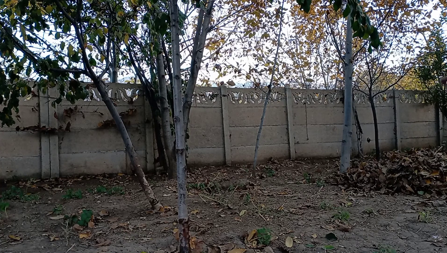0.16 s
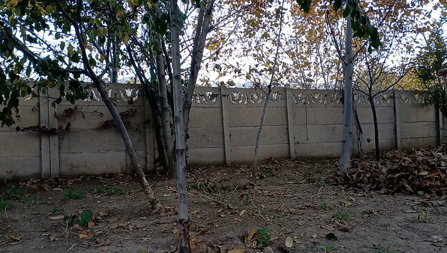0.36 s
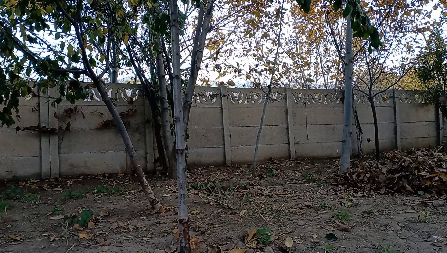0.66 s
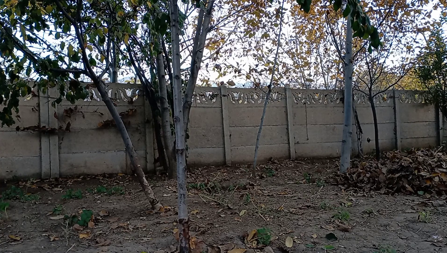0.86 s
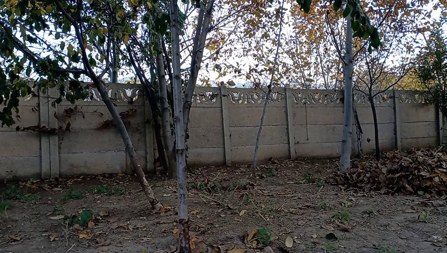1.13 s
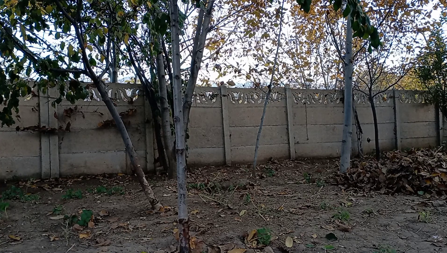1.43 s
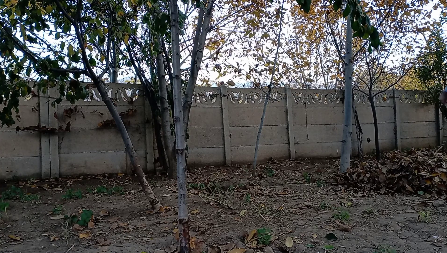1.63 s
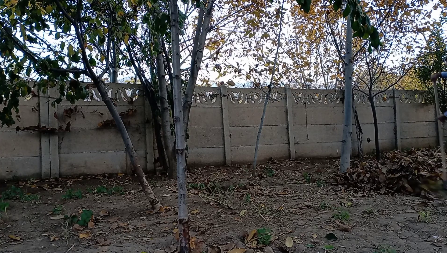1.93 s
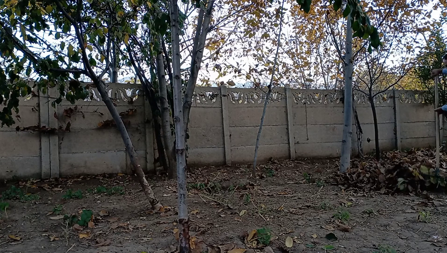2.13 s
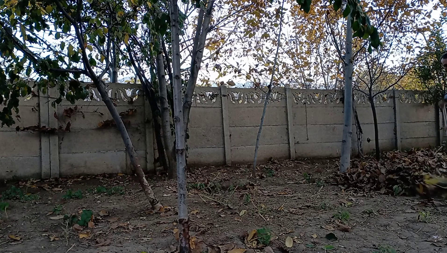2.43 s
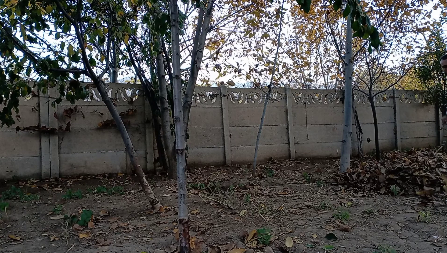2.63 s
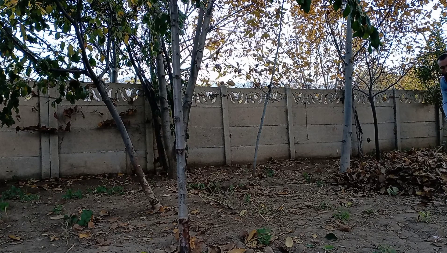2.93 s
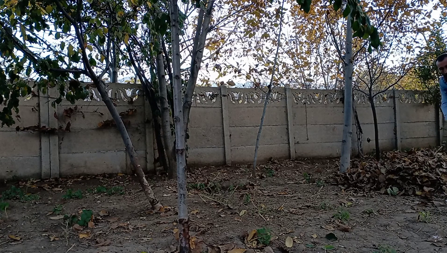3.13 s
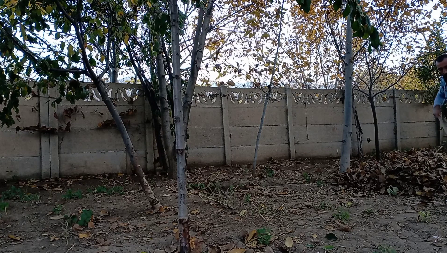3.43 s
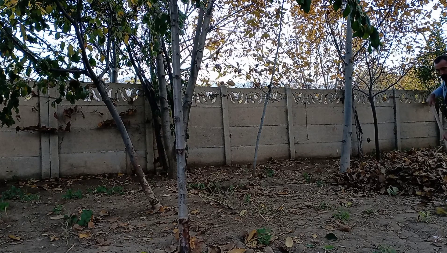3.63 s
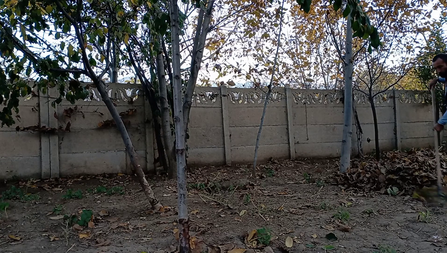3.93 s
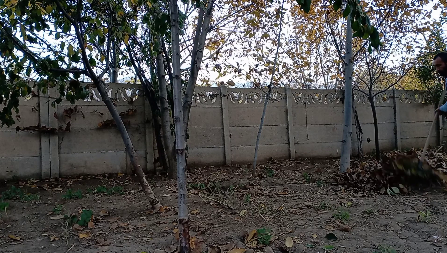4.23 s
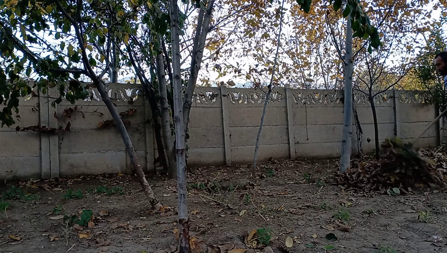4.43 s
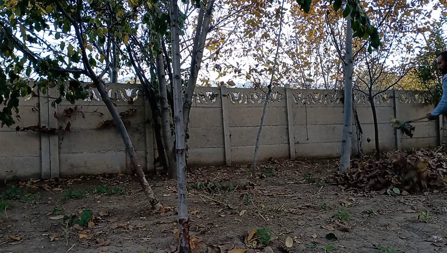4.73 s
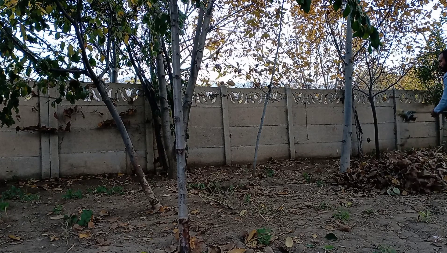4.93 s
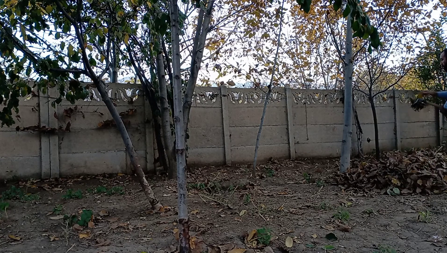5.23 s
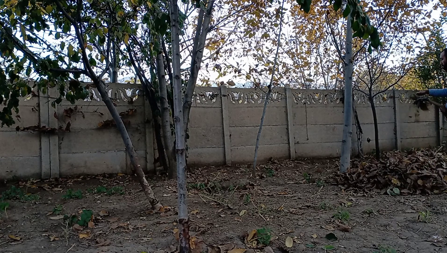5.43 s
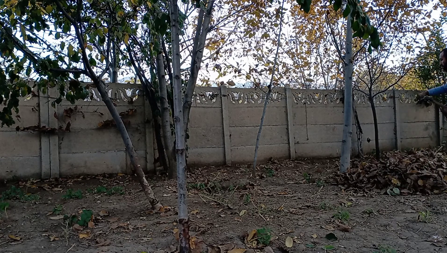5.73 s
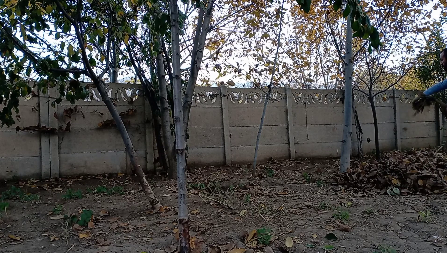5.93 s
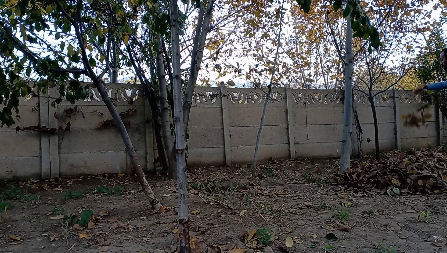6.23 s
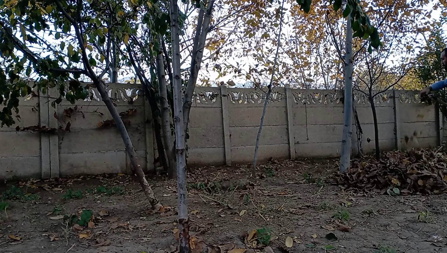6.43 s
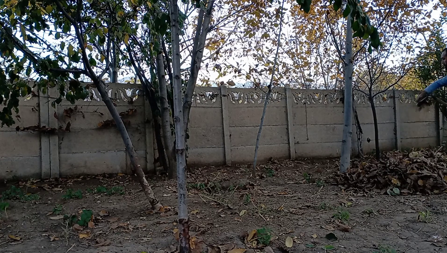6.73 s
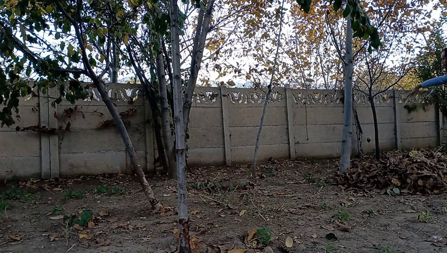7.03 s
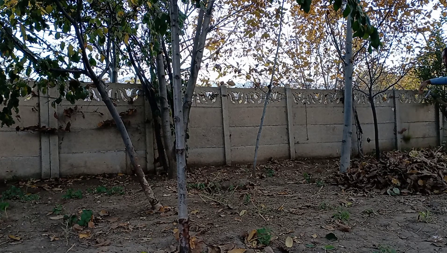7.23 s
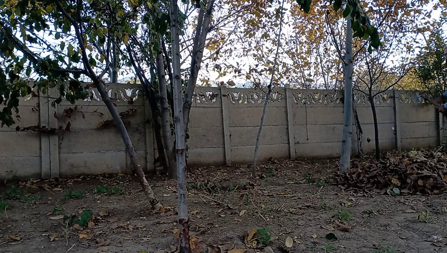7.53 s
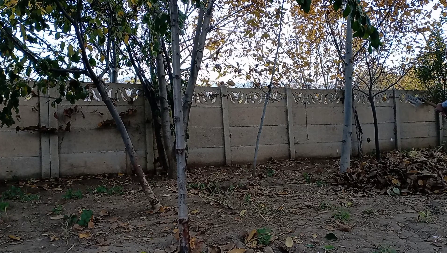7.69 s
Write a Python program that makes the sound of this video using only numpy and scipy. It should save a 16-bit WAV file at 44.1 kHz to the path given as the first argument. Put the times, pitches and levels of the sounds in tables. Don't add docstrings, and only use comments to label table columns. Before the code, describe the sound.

Outdoors in a walled garden, a rake drags dry leaves over bare soil to the right of a close stereo microphone. Crisp crackling surges and twig snaps build to a bright metallic click near two seconds. After a lull come short bites, a broad swell around four seconds, then faint, scattered scrapes and ticks over barely audible traffic.

```python
import sys
import numpy as np
from scipy import signal
from scipy.fft import rfft, irfft, next_fast_len
from scipy.io import wavfile
from scipy.ndimage import uniform_filter1d, map_coordinates

SR = 44100
rng = np.random.default_rng(int(sys.argv[2]) if len(sys.argv) > 2 else 0)


def convert_level_to_amplitude(level_db):
    exponent = np.asarray(level_db, float) / 20
    return 10 ** exponent


def transcribe(u):
    v = np.clip(np.atleast_2d(u).T, -1, 1)
    q = np.round(v * 32767).astype(np.int16)
    wavfile.write(sys.argv[1], SR, q)


N = 346626

# t/s, delay of the left port/samples
BEARING = [(0, 14), (.5, 11), (1.2, 14.3), (1.9, 11.66), (2.35, 10.5), (3.1, 13.6), (3.7, 11.5), (4.5, 9.3),
           (5.5, 10.8), (6.7, 11.3), (7.86, 8.7)]

# f/Hz, density/dB
CRISP_COLOUR = [(2500, -20), (4500, 0), (6000, 0.5), (9000, 1), (16000, -1.5)]
# f/Hz, density/dB
TICK_COLOUR = [(1200, -46.5), (2500, -10), (5000, 4), (16000, -0.5)]
# f/Hz, density/dB
BODY_COLOUR = [(400, -32), (800, -9), (1500, -3.5), (3500, -2), (5500, -5.5), (9000, -23)]
# f/Hz, density/dB
SOIL_COLOUR = [(60, -50.5), (130, -6), (300, -2), (500, -5), (800, -10), (1600, -39.5)]

# t of full effort/s, crackle level/dB, rise/s, fall/s,
# soil above the crackle/dB
PULLS = [(.332, -44, 0.57, 0.17, -13.5), (.6, -57, 0.38, 0.56, -12), (0.949, -56.5, .12, 0.053, -15.5),
         (1.17, -62.5, 0.19, 0.033, -9.5), (1.49, -46, .11, 0.51, -15.5), (1.69, -46.5, 0.24, 0.031, -11),
         (1.84, -45, .13, 0.22, -29), (1.939, -37.5, 0.039, 0.091, -23), (2.07, -44, 0.29, 0.083, -10.5),
         (2.2, -55, 0.17, 0.46, -14.5), (2.474, -50, 0.41, 0.11, -15), (2.805, -58, 0.055, 0.1, -12.5),
         (3.112, -48, 0.056, 0.04, -12.5), (3.721, -45, .15, 0.028, -13.5),
         (3.872, -44.5, 0.023, .045, -15), (4.128, -41.5, 0.41, 0.27, -15), (4.45, -54, .4, 0.69, -21),
         (4.87, -53.5, .7, 0.21, -12.5), (5.2, -67, 0.54, 0.41, -8), (5.975, -50.5, .09, 0.17, -19),
         (6.355, -61.5, 0.03, 0.083, -14), (6.285, -65.5, 0.024, 0.063, -8),
         (3.19, -51, 0.045, 0.04, -11.5), (7.64, -64, 0.05, 0.14, -9.5)]
# t/s, crackle level/dB, rise/s, fall/s, soil above the crackle/dB
CLUMPS = [(.05, -55, .1, 0.18, -15.5), (.732, -56, 0.024, 0.01, -20), (1.208, -52.5, 0.013, 0.037, -7.5),
          (1.365, -57, 0.016, 0.037, -10), (1.515, -42.5, 0.01, 0.06, -17), (1.854, -37, 0.023, 0.017, -38),
          (2.745, -60, .012, .05, -25), (3.349, -41.5, 0.01, 0.055, -19), (3.404, -42, .04, .05, -17),
          (5.435, -66.5, .011, .12, -4.5), (5.689, -57, .003, 0.074, -11.5), (6.14, -66, 0.057, 0.069, -1),
          (6.43, -64, 0.005, 0.045, -19), (6.475, -61.5, 0.024, 0.04, -12),
          (6.562, -48, 0.029, 0.031, -24.5), (6.74, -52.5, .025, 0.069, -27),
          (6.853, -54, 0.005, 0.048, -17), (6.94, -59.5, 0.014, 0.032, -16),
          (6.995, -61, 0.017, 0.084, -13), (7.245, -68, 0.032, 0.02, -9.5),
          (7.434, -55.5, 0.036, 0.023, -24), (7.51, -63.5, .03, .025, -12),
          (7.545, -53.5, 0.018, 0.07, -13.5), (4.68, -57.5, .04, .08, -11.5)]
# t/s, length/s, crackle level/dB, drift to the end/dB,
# soil above the crackle/dB
DRAGS = [
    (3.209, .125, -47.5, 1.9, -15),
    (3.44, 0.2, -48, -1, -16),
    (5.522, .155, -54, -8.5, -16),
    (5.686, 0.26, -53.5, 0.5, -20),
    (6.505, .335, -51, -6.5, -21),
    (7.389, 0.11, -59.5, -2, -17),
]
BITE_S, LIFT_S = 0.0055, 0.012
TAPER = 0.097
REST_DB = -81.5
# t/s, leaf body above the crackle/dB
LITTER = [(0, -9), (.5, -10.5), (1.3, -9.5), (1.5, -11.5), (2.05, -8), (2.5, -11.5), (3.3, -12.5),
          (3.9, -8.5), (4.2, -10.5), (4.8, -10.5), (5.3, -11.5), (5.8, -8.5), (6.3, -12.5), (6.65, -14.5),
          (7.0, -9.5), (7.86, -10.5)]
BODY_LAGS = 0.03
BODY_DIGS = 0.16

# f/Hz, density/dB
TRAFFIC_COLOUR = [(15, -58), (25, -20), (102, -3.5), (277, -9.5), (312, -11), (604, -22.5), (655, -23.5),
                  (784, -26), (1320, -32), (3000, -32), (3900, -71), (6600, -120)]
# f/Hz, likeness/1
TRAFFIC_ALIKE = [(50, 0.98), (300, 0.43), (700, 0.19)]
# t/s, level/dB
TRAFFIC_LEVEL = [(0, -68), (1.4, -67.5), (2.05, -63), (2.3, -67.5), (3.9, -64.5), (4.4, -68.5), (6.1, -67),
                 (7.86, -68)]
# t/s, f/Hz, level/dB
ENGINE = [
    (2.35, 135.0, -47),
    (2.424, 136.1, -71),
    (2.506, 147.2, -85),
    (2.722, 151.0, -72),
    (3.066, 146.7, -76),
    (3.12, 156.7, -66),
    (3.158, 161.5, -74),
    (3.3, 159.2, -66),
]

# f/Hz, t60/s
FENCE_T60 = [(200, 0.092), (2000, 0.26), (10000, 0.16)]

# t/s, peak level/dB, splintering above it/dB, low part above it/dB
TWIGS = [(.1502, -26.5, -5, -25), (.9865, -25, -9.5, -31.5), (1.5006, -18.5, -8.5, -28),
         (1.5444, -25, -19, -19), (1.5884, -27.5, -13, -11.5), (1.8414, -32, -8, -3.5),
         (1.8524, -18.5, -9, -15.5), (1.9344, -17, -13, -27), (2.7037, -38, -7, -27),
         (3.0355, -50.5, -2, -11), (3.0749, -32.5, -8, -31), (3.1108, -33, -3, -27), (3.2151, -38, -2, -17),
         (3.283, -26, -13, -23), (3.3395, -21.5, -7.5, -43), (3.492, -26, -9, -22), (4.7294, -51, -9, 4),
         (5.4191, -34, -10, -19), (5.5275, -37, -6, -23), (5.7359, -32, -14, -17), (5.7595, -33, -5, -17),
         (5.9324, -34, -16, -14), (6.5086, -32, -16, -31), (6.5524, -44, -13, -29),
         (6.6648, -32, -3.5, -28), (6.7281, -39.5, 1, -22.5), (7.1746, -48, -9, -14.5),
         (7.2185, -46, -3, -35)]
# t/s, peak level/dB
STALKS = [(0.697, -42), (1.2012, -45), (2.5214, -37), (2.7422, -50.5), (2.7721, -42), (2.788, -38),
          (2.8133, -38.5), (3.3424, -37), (3.8292, -38), (5.1657, -40), (5.2265, -44), (5.5084, -49),
          (5.686, -44), (6.119, -48), (6.2577, -51), (6.312, -44), (6.344, -43), (6.466, -42),
          (6.5006, -47), (6.6714, -39.5), (6.93, -41.5), (7.017, -45.5), (7.2085, -50), (7.141, -53),
          (7.3846, -45.5), (7.4154, -48), (7.4724, -48), (7.5328, -40)]
STALK_SPLINTER_DB, STALK_LOW_DB = -6, -30
SNAP_T60 = 0.0098

# t/s, peak level/dB, f/Hz
THUDS = [
    (1.202, -42, 275),
    (3.279, -44, 262),
    (4.727, -46, 326),
    (5.559, -46, 145),
    (5.6, -45, 226),
    (5.706, -44, 350),
    (6.084, -40, 252),
    (6.126, -40, 116),
    (6.28, -47, 310),
]

# t/s, ring f/Hz, peak level/dB, t60/s
CLICK = [
    (1.9146, 8600, -11, 0.0087),
    (1.9150, 12400, -16, 0.04),
    (1.9166, 6600, -13, 0.023),
    (1.9168, 10200, -18.5, .02),
    (1.9163, 13400, -12.5, 0.062),
    (1.9195, 11000, -24, 0.057),
    (1.9195, 1950, -24, .04),
    (1.9180, 4100, -22.5, 0.033),
    (1.9225, 7400, -30, 0.042),
]

# t/s, length/s, first f/Hz, last f/Hz, level/dB
COOS = [
    (5.001, 0.36, 425, 296, -72),
    (5.513, 0.27, 319, 364, -74),
    (6.22, 0.119, 370, 279, -70),
    (6.62, .09, 295, 260, -66),
]
COO_EDGE_S = 0.022

# f/Hz, gain/dB
PORT = [(22, -8.5), (45, 1), (5500, 2), (6500, 4), (7800, 6.5), (9400, 11.5), (10600, 10.5), (11700, 5),
        (13500, 2.2), (15700, -0.5)]
# f/Hz, left minus right/dB
SHADOW = [(200, -0.3), (4000, -1.5), (8700, -4.5), (10500, -1.5), (12000, 1.5), (15000, -3)]


def unit(x):
    return x / np.sqrt(np.mean(x ** 2) + 1e-20)


def along(points, hz):
    f, v = np.transpose(points)
    return np.interp(np.log(hz + 1), np.log(f + 1), v)


def curves(rows):
    s, *cols = np.transpose(rows)
    return [np.interp(np.arange(N) / SR, s, c) for c in cols]


def wobble(rate):
    knots = rng.standard_normal(int(N * 200 / SR) + 4)
    return map_coordinates(knots, [np.arange(N) * rate / SR])


def filtered(x, response):
    m = next_fast_len(N + 8192)
    return irfft(rfft(x, m) * response(np.fft.rfftfreq(m, 1 / SR)), m)[..., :N]


def coloured(x, spectrum):
    return filtered(x, lambda hz: convert_level_to_amplitude(along(spectrum, hz)))


def cracks(at, size, late):
    tap = np.arange(-5, 7)
    out = []
    for when in (at + late / 2, at - late / 2):
        where = np.floor(when)[:, None] + tap
        off = where - when[:, None]
        shape = np.sinc(off) * np.cos(np.pi * off / 14) ** 2
        index = np.clip(where, 0, N - 1).astype(int).ravel()
        out.append(np.bincount(index, (size[:, None] * shape).ravel(), N))
    return np.array(out)


def rings(s, hz, db, t60, rough):
    t = np.arange(SR // 16)
    wander = rough * np.cumsum(rng.standard_normal((len(s), len(t))), axis=1)
    phase = 2 * np.pi * hz * t / SR + wander
    decay = convert_level_to_amplitude(db - 60 * t / SR / np.maximum(t60, .003))
    burst = decay * (1 - np.exp(-t / 2.6)) * np.sin(phase)
    late = curves(BEARING)[0][(s * SR).astype(int)] + 0 * t
    return cracks((s * SR + t).ravel(), burst.ravel(), late.ravel())


def tent(t, s, length, rise, fall):
    before = np.maximum(s - t, 0) / np.maximum(rise, .002)
    after = np.maximum(t - s - length, 0) / np.maximum(fall, .002)
    away = before + after
    return -10 * away * (1 - TAPER + TAPER * away)


def effort():
    t = np.arange(0, N, 44) / SR
    s, db, rise, fall, swell_soil = np.transpose(PULLS + CLUMPS)[:, :, None]
    swells = db + tent(t, s, 0, rise, fall)
    s, length, db, drift, drag_soil = np.transpose(DRAGS)[:, :, None]
    drags = db + drift * np.clip((t - s) / length, 0, 1) + tent(t, s, length, BITE_S, LIFT_S)
    crackle = np.vstack([swells, drags])
    soil = crackle + np.vstack([swell_soil, drag_soil])
    total = lambda db: 10 * np.log10(np.sum(convert_level_to_amplitude(db) ** 2, axis=0) + convert_level_to_amplitude(REST_DB) ** 2)
    return curves(np.transpose([t, total(crackle), total(soil)]))


def patchy(x, depth_db):
    z = signal.stft(x, nperseg=256)[2]
    field = rng.standard_normal(z.shape[1:])
    field = uniform_filter1d(field, size=7, axis=0)
    field = uniform_filter1d(field, size=6, axis=1)
    return signal.istft(z * convert_level_to_amplitude(depth_db * unit(field)), nperseg=256)[1][:, :N]


def swarm(count, spread_db, width, spectrum):
    draw = rng.random((count, 3))
    at = draw[:, 0] * (N - 1)
    rarity = np.minimum(-np.log(1 - draw[:, 1]), 4)
    size = convert_level_to_amplitude(spread_db * rarity) * np.tanh(rng.standard_normal(count))
    late = curves(BEARING)[0][at.astype(int)] + width * (draw[:, 2] - .5)
    return unit(patchy(coloured(cracks(at, size, late), spectrum), depth_db=1.67))


def leaves():
    crisp_db, soil_db = effort()
    depth_db = soil_db - crisp_db
    lag_db = BODY_LAGS * (crisp_db - crisp_db.mean())
    dig_db = BODY_DIGS * (depth_db - depth_db.mean())
    body_db = curves(LITTER)[0] - lag_db + dig_db
    surge = 0.98 * wobble(16) + 0.7 * wobble(45) + 0.3 * wobble(150)
    crisp = swarm(count=120000, spread_db=-0.5, width=3.9, spectrum=CRISP_COLOUR)
    ticks = swarm(count=1500, spread_db=0.5, width=5.3, spectrum=TICK_COLOUR)
    body = swarm(count=60000, spread_db=0.5, width=6.3, spectrum=BODY_COLOUR)
    soil = swarm(count=20000, spread_db=1.0, width=3.5, spectrum=SOIL_COLOUR)
    crisp = (crisp + convert_level_to_amplitude(-10.5) * ticks) * convert_level_to_amplitude(crisp_db - 3.0 + surge)
    body *= convert_level_to_amplitude(crisp_db + body_db + 1.77 + 0.82 * surge + 1.26 * wobble(25))
    soil *= convert_level_to_amplitude(soil_db + 0.5 + .3 * surge + 1.07 * wobble(14))
    return crisp + body + soil


def fence(x):
    hz, t, z = signal.stft(rng.standard_normal((2, SR // 3)), SR, nperseg=256)
    decay = convert_level_to_amplitude(-60 * t / along(FENCE_T60, hz)[:, None])
    tail = signal.istft(z * decay, SR, nperseg=256)[1]
    delayed = np.pad(x, (300, 0))[None]
    return signal.fftconvolve(delayed, tail / np.linalg.norm(tail[0]), axes=1)[:, :N]


def traffic():
    turn = lambda hz: np.arccos(np.clip(along(TRAFFIC_ALIKE, hz), -1, 1)) / 2
    pair = coloured(rng.standard_normal((2, N)), TRAFFIC_COLOUR)
    mid, side = filtered(pair, lambda hz: np.array([np.cos(turn(hz)), np.sin(turn(hz))]))
    rumble_db = curves(TRAFFIC_LEVEL)[0] - 0.04 + 0.72 * wobble(2.93)
    rumble = unit(np.array([mid + side, mid - side])) * convert_level_to_amplitude(rumble_db)
    hz, db = curves(ENGINE)
    t = np.arange(N) / SR
    passing = np.clip(np.minimum(t - ENGINE[0][0], ENGINE[-1][0] - t) / 0.15, 0, 1)
    turns = 2 * np.pi * np.cumsum(hz) / SR
    orders = np.sin(turns) + .45 * np.sin(turns * 3 / 2) + .3 * np.sin(turns * 2)
    return rumble + passing * convert_level_to_amplitude(db + 5.5 + 2.6 * wobble(12)) * orders


def snaps():
    rows = TWIGS + [(s, db, STALK_SPLINTER_DB, STALK_LOW_DB) for s, db in STALKS]
    s, db, splinter_db, low_db = np.transpose(rows)[:, :, None]
    s = s + 0.000683
    late = curves(BEARING)[0][(s[:, 0] * SR).astype(int)]
    crack = coloured(cracks(s[:, 0] * SR, convert_level_to_amplitude(db[:, 0] - 3), late), TICK_COLOUR)
    splinters = coloured(rings(s, 9000, db + splinter_db, SNAP_T60, rough=1.52), CRISP_COLOUR)
    dull = coloured(rings(s, 2547, db + low_db + 6.5, 1.33 * SNAP_T60, rough=0.72), BODY_COLOUR)
    return crack + splinters + dull


def thuds():
    s, db, hz = np.transpose(THUDS)[:, :, None]
    pushes = rings(s, hz, db - 3.5, 0.083, rough=0.044)
    return coloured(pushes, [(60, -20), (120, -4.0), (700, -9.5), (2500, -30)])


def click():
    s, hz, db, t60 = np.transpose(CLICK)[:, :, None]
    steel = coloured(rings(s, hz, db, t60, rough=0.18), [(600, -31), (1500, -6.0)])
    crack = rings(s, 11000, db - 3.5, 0.64 * t60, rough=1.464)
    return steel + coloured(crack, [(2500, -31), (6000, 0), (12000, -9.5), (16000, 7)])


def dove():
    t, out = np.arange(N) / SR, 0
    for s, length, first_hz, last_hz, db in COOS:
        glide = np.clip((t - s) / length, 0, 1)
        hz = first_hz + (last_hz - first_hz) * glide + 9 * wobble(15)
        level = convert_level_to_amplitude(db + tent(t, s, length, COO_EDGE_S, COO_EDGE_S))
        out = out + level * np.sin(2 * np.pi * np.cumsum(hz) / SR)
    return convert_level_to_amplitude(5.5 * wobble(14) - 3) * out


def scene():
    rake = leaves() + snaps() + thuds() + click()
    return rake + convert_level_to_amplitude(-10.5) * fence(rake[1]) + traffic() + dove()


def band_limit(x):
    return signal.sosfilt(signal.butter(12, 15760, fs=SR, output="sos"), x)


def record(dry):
    hiss = convert_level_to_amplitude(-78) * rng.standard_normal(dry.shape)

    def response(hz):
        half = along(SHADOW, hz) / 2
        return (hz < 15760) * convert_level_to_amplitude(along(PORT, hz) + [half, -half])

    return band_limit(filtered(dry + hiss, response))


dry = scene()
out = record(dry)
transcribe(out)
```